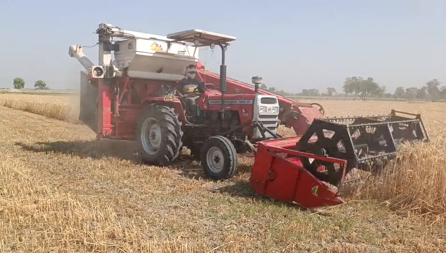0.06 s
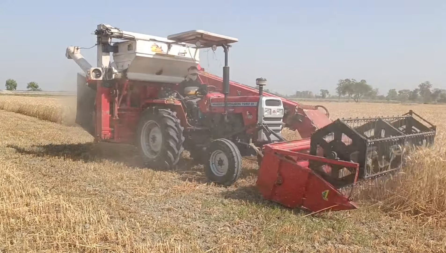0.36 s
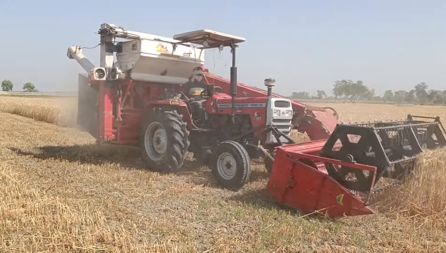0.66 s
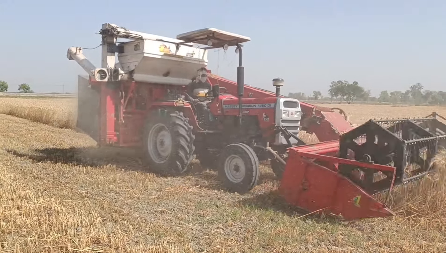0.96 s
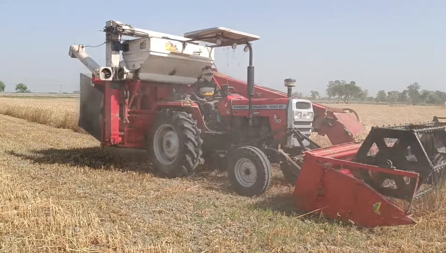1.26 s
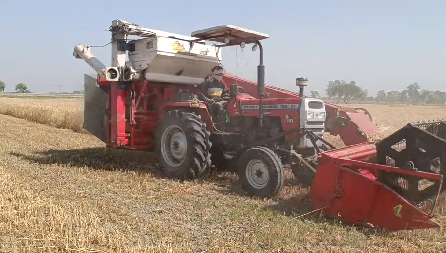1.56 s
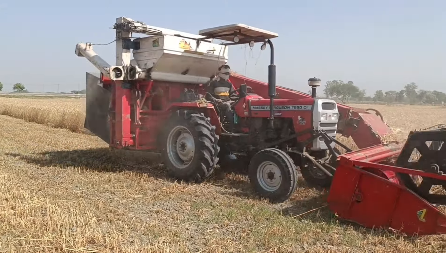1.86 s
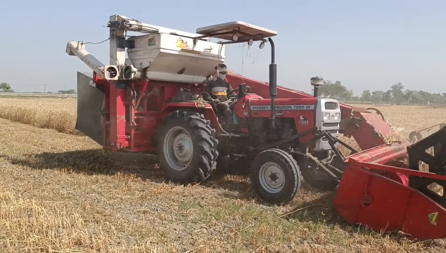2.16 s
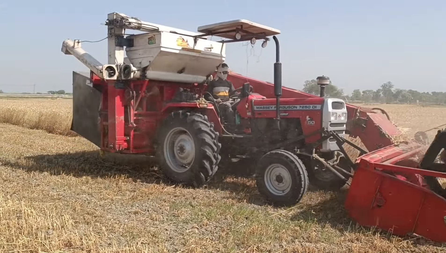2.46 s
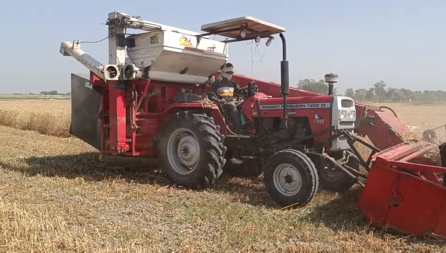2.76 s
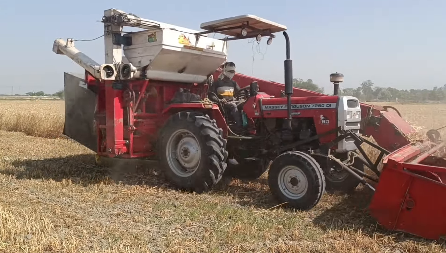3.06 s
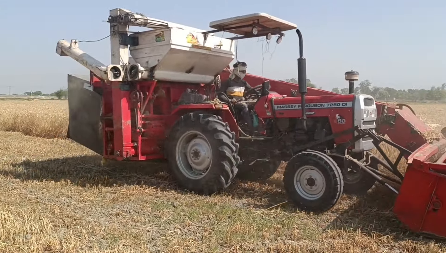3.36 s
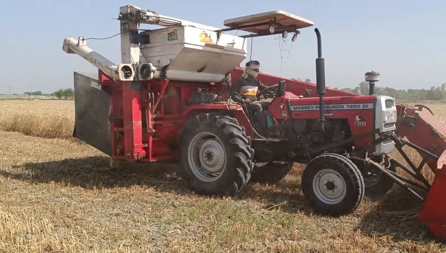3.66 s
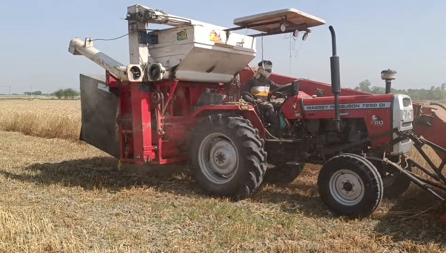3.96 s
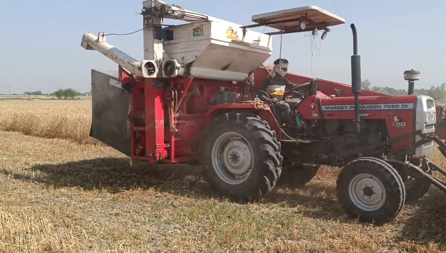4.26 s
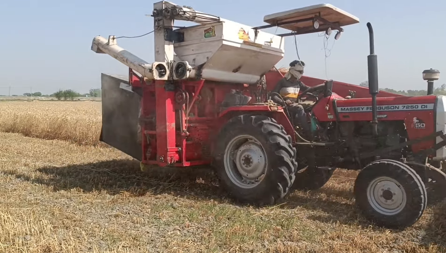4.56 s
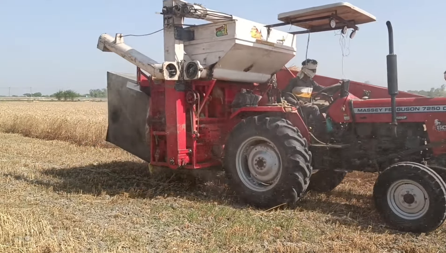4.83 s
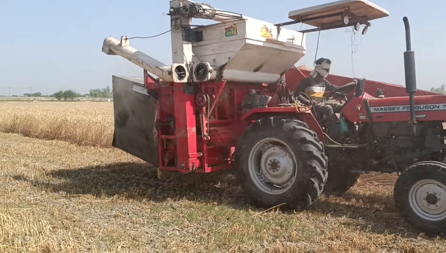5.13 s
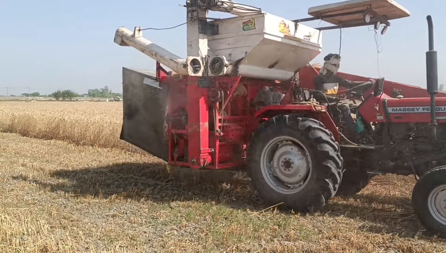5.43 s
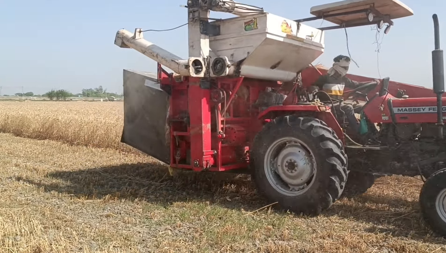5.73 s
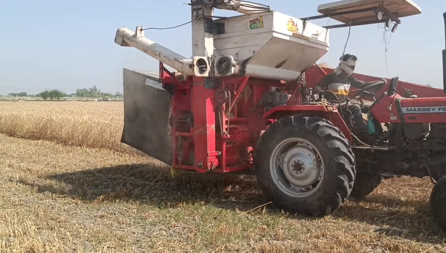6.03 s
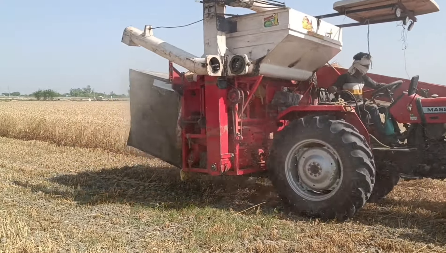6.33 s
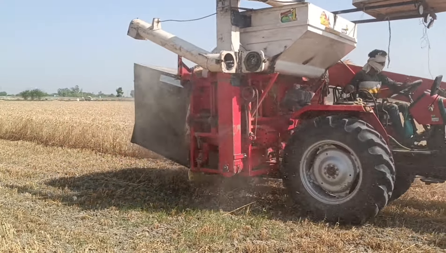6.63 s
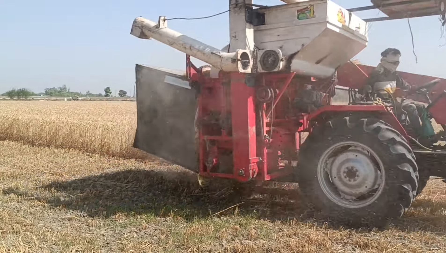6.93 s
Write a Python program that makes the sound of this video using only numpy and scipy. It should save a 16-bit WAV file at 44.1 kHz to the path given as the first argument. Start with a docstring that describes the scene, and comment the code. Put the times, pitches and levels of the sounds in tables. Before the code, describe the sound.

Stiff, gusty wind buffets the microphone in an open field while a combine harvester runs nearby without a break. Its diesel engine chugs under a swelling and sinking rush of straw, with rattling panels and clattering blades. Bright metal clinks cluster midway as the cutter passes, along with snapping stalks. Toward the end, clumps of crop scrape and knock against the machine's side.

```python
"""A combine harvester in the wind

A tractor-mounted combine crawls through wheat, a few metres from a phone in a stiff breeze.
Straw and grain rush through the thresher, the diesel knocks, stalks crack and loose steel clinks.
Wind buffets each microphone port (opening) on its own and lays a fluttering rumble over the machine."""
import sys
import numpy as np
from scipy import signal
from scipy.fft import rfft, irfft, next_fast_len
from scipy.io import wavfile
from scipy.ndimage import uniform_filter1d, map_coordinates

SR = 44100
rng = np.random.default_rng(int(sys.argv[2]) if len(sys.argv) > 2 else 0)


def master_out(mix):
    """Clip the mix to full scale and print it as 16-bit PCM to the path in sys.argv[1]."""
    frames = np.transpose(np.atleast_2d(mix))
    ceiling = np.clip(frames, -1, 1)
    pcm = np.round(ceiling * 32767).astype(np.int16)
    wavfile.write(sys.argv[1], SR, pcm)


N = 312669
TIME = np.arange(N) / SR
FIRING_HZ, CUTTER_HZ = 59.2, 14.7  # engine firings and knife strokes each second
PASSING_S, PASSING_HALF_S = 4.5, .97  # when the cutter bar is closest, and half how long it stays near


def undb(db):
    """Turn decibels into a gain to multiply by."""
    return 10 ** (np.asarray(db) / 20)


def unit(x):
    """Scale to an average strength (rms) of 1."""
    return x / np.sqrt(np.mean(x ** 2))


def curves(table):
    """Join each column's points with straight lines in time."""
    s, *columns = np.transpose(table)
    return [np.interp(TIME, s, c) for c in columns]


def bump(middle_s, half_s):
    """A smooth rise and fall, 1 at its top."""
    return np.exp(-((TIME - middle_s) / half_s) ** 2)


def swells(table):
    """Add up smooth rises and dips, in dB."""
    return sum(db * bump(s, half_s) for s, db, half_s in table)


def panned(pan_db):
    """Left and right gains of constant power; pan is the left level minus the right."""
    gains = undb(np.array([pan_db, -pan_db]) / 2).reshape(2, -1)
    return gains / np.sqrt(np.mean(gains ** 2, axis=0))


def shape(x, spectrum):
    """Turn each frequency up or down along one curve, or one for each side."""
    hz, *columns = np.transpose(spectrum)
    size = next_fast_len(N)
    log_hz = np.log(np.arange(size // 2 + 1) * SR / size + 1)
    gain = undb([np.interp(log_hz, np.log(hz), c) for c in columns])
    return irfft(rfft(x, size) * gain, size)[:, :N]


def colour(x, spectrum):
    """Shape the tone, then scale to strength 1."""
    return unit(shape(x, spectrum))


def ring(x, modes):
    """Make a sound ring at an object's own pitches, its modes."""
    return sum(undb(db) * signal.lfilter(*signal.iirpeak(hz, hz / width, fs=SR), x)
               for hz, width, db in modes)


def walk(rate):
    """Glide to a new random value `rate` times a second."""
    hold = int(SR / rate)
    steps = rng.standard_normal(1024)[np.arange(N) // hold % 1024]
    return unit(uniform_filter1d(uniform_filter1d(steps, hold), hold // 2))


def per_port(rate):
    """A separate, limited random walk for each port."""
    return unit(np.tanh(.6 * np.array([walk(rate), walk(rate)])))


def fade(hits, decay_s):
    """Let every hit jump up and die away."""
    return signal.lfilter([1], [1, -np.exp(-1 / (decay_s * SR))], hits)


def pelting(rate, spread_db):
    """Hits at random moments: many small, a few large."""
    when, size = rng.random((N, 2)).T
    return (when < rate / SR) * undb(spread_db * np.minimum(-np.log(1 - size), 4))


def shower(rate, spread_db, decay_s):
    """The flickering power of many small hits, 1 on average."""
    power = fade(pelting(rate, spread_db) ** 2, decay_s)
    return power / power.mean()


def strokes(hz, jitter, scatter_db):
    """One hit a cycle, each early or late and of its own size; the speed wanders."""
    timing, size, drift = rng.standard_normal((1024, 3)).T
    cycles = np.arange(1024) + jitter * timing + .022 * np.cumsum(drift)
    at = (cycles * SR / hz).astype(int)
    inside = (at >= 0) & (at < N)
    return np.bincount(at[inside], undb(scatter_db * np.tanh(size[inside] / 2) * 2), N)


def bursts(table, decay_s):
    """Left and right loudness of listed blows, each dying away."""
    hits = np.zeros((2, N))
    for s, db, pan_db in table:
        hits[:, int(s * SR)] = undb(db) * panned(pan_db)[:, 0]
    return fade(hits, decay_s)


# how much later sound reaches the left port as the machine moves right: (time [s], delay [ms])
LEFT_DELAY = [(0, .075), (2.75, .2), (7.09, .49)]
def airborne(direct):
    """Noise at both ports: a direct share, late on the left, and a scattered rest."""
    common = rng.standard_normal(N)
    delay = curves(LEFT_DELAY)[0] * SR / 1000
    late = map_coordinates(common, [np.arange(N) - delay], order=3)
    scattered = rng.standard_normal((2, N))
    return np.sqrt(direct) * np.array([late, common]) + np.sqrt(1 - direct) * scattered


# tone of rushing straw and grain: (frequency [Hz], left level [dB], right level [dB])
STRAW_TONE = [(1500, -44, -29), (2720, -6.5, -6.5), (3660, -10, 1), (4470, -16, -1.5), (4950, 1.5, -3),
              (5260, -11, -2), (6100, 0, -2), (6270, -2.5, 2), (7430, 7, 5), (7600, 1, 3.5),
              (8750, -3.5, -4), (10450, 2, 2.5), (15400, -11.5, -15)]
# tone of the thresher's metal body: (frequency [Hz], left level [dB], right level [dB])
BODY_TONE = [(398, -3, -29), (996, 8, 5), (1220, -9, -14), (1490, 4, -1), (1820, -1.5, -15),
             (2170, 2.5, -7.5), (2860, -7.5, -31), (4870, -35, -7.5)]
def thresher(firings):
    """Chaff hisses in fine showers, stalks thump the metal in coarser ones; both pulse with the engine."""
    knock = unit(fade(np.sqrt(firings), decay_s=.017))
    surge = undb(.8 * walk(rate=28))
    chaff = shower(rate=500, spread_db=3, decay_s=.003)
    stalks = shower(rate=220, spread_db=2.4, decay_s=.0045)
    straw = surge * np.sqrt(.35 + .65 * chaff + .3 * knock ** 2) * airborne(direct=.026)
    body = surge * np.sqrt(.073 + .41 * stalks + 1.7 * knock ** 2) * airborne(direct=.079)
    return colour(straw, STRAW_TONE), colour(body, BODY_TONE)


# strength of the sheet-metal rattle: (time [s], level [dB], pan before narrowing [dB])
RATTLE_LEVEL = [(0.0, -44, 5), (1.64, -30, -8), (1.74, -40.5, 3), (2.85, -42, 3), (3.21, -36.5, 11),
                (3.31, -40, -10), (3.93, -33, -7), (4.03, -31.5, 2), (4.71, -39.5, 15), (4.81, -35, 17),
                (4.99, -37, -2), (6.65, -34.5, 2), (6.82, -30, 3), (7.09, -30, -6)]
def rattle(body):
    """The thresher's sheet metal rattles louder and softer, swinging a little from side to side."""
    db, pan_db = curves(RATTLE_LEVEL)
    return undb(db + 4.5) * body * panned(.39 * pan_db - .5)


# ring of the steel parts: (pitch [Hz], width [Hz], level [dB])
STEEL_MODES = [(1900, 150, -8), (2100, 150, -9), (3230, 140, -9), (3620, 180, -4), (3850, 180, -6),
               (4035, 90, 0), (5000, 300, -11), (7360, 170, 2), (7750, 300, -4), (8200, 300, -7)]
def cutter():
    """The knife bar slaps its guides, louder as it passes; each blow favours other modes of the steel."""
    slaps = strokes(CUTTER_HZ, jitter=.1, scatter_db=3) + .45 * pelting(rate=90, spread_db=2.4)
    scrape = fade(slaps, decay_s=.002) * airborne(direct=.4)
    steel = sum(ring(scrape * undb(1.6 * walk(rate=190)), [mode]) for mode in STEEL_MODES)
    return undb(-13.5 + 2 * bump(PASSING_S, PASSING_HALF_S)) * unit(steel)


# ring of a snapping stalk: (pitch [Hz], width [Hz], level [dB])
SNAP_MODES = [(3700, 260, -16), (4030, 180, -7), (7800, 350, 7), (7830, 440, 8), (5500, 4000, -6)]
def snaps():
    """Single dry stalks snap against the steel, mostly on the right."""
    hits = fade(pelting(rate=45, spread_db=2.2), decay_s=.0011)
    return undb(-13.5) * panned(-4) * unit(ring(hits * airborne(direct=.11), SNAP_MODES))


def pings():
    """Kernels and stubs hit the panels at random; each spot rings briefly at its own pitch."""
    per_s, ring_s, spread_db = 420, .003, 2
    low_hz, high_hz = 1400, 4400
    out, t = np.zeros((2, N + 1024)), np.arange(1024) / SR
    for when, pitch, size, side, *phases in rng.random((int(per_s * N / SR), 6)):
        hz = low_hz + (high_hz - low_hz) * pitch
        tone = np.sin(2 * np.pi * (hz * t + np.array(phases)[:, None])) * np.exp(-t / ring_s)
        db = spread_db * min(-np.log(1 - size), 3)
        start = int(when * N)
        out[:, start:start + len(t)] += undb(db) * panned(20 * (side - .5)) * tone
    return undb(-13) * unit(out[:, :N])


# strength of the rush, which swells and sinks: (time [s], level [dB], pan before a shift left [dB])
RUSH_LEVEL = [(0.0, -28, -5.5), (1.05, -26.5, -5), (1.15, -26, -9), (1.53, -26, -3), (1.8, -26, -12.5),
              (2.3, -28, -8), (2.41, -33, -2), (2.55, -32.5, -6), (2.85, -32, -9.5), (3.16, -24.5, -3),
              (3.67, -29.5, -13), (4.06, -23.5, -1.5), (4.4, -28, -4.5), (5.22, -31, -2.5), (5.32, -33, 2),
              (5.54, -27, -3.5), (6.05, -31, 1), (6.85, -25, -3), (7.09, -22.5, -4)]
# wads of straw in the drum, and gaps between them: (middle [s], change [dB], half length [s])
STRAW_WADS = [(.23, -5, 0.15), (.33, 7, 0.028), (.47, 1.5, 0.03), (.83, 3.5, .025), (1.0, 5.5, .025),
              (1.13, 2, 0.033), (1.49, 5.5, 0.042), (1.86, -3.5, 0.049), (2.31, 5, 0.017),
              (2.58, 7.5, 0.028), (2.725, 6, 0.021), (2.96, 6, 0.037), (4.39, 0, 0.032), (4.6, 4.5, 0.038),
              (4.72, -8, 0.021), (4.79, 3.5, 0.16), (4.992, -2, .016), (5.08, -3, .015), (5.2, 8.5, 0.017),
              (5.67, 2.5, 0.014), (5.745, -1, 0.022), (5.92, 3, 0.032), (6.16, 2, 0.018), (6.26, 5, 0.033),
              (6.36, -3, 0.02), (6.42, 2, 0.02), (6.87, 2, 0.055)]
def rush(straw):
    """Straw, cutter, snaps and pings grow louder and softer together."""
    db, pan_db = curves(RUSH_LEVEL)
    level = undb(db + swells(STRAW_WADS) - .12)
    return level * (straw + cutter() + snaps() + pings()) * panned(pan_db + 5)


# ring of the exhaust pipe: (pitch [Hz], width [Hz], level [dB])
PIPE_MODES = [(121, 78, 6.5), (220, 90, 4), (340, 254, 5)]
def exhaust(firings):
    """Each firing of the diesel sets the pipe booming."""
    return undb(-28.5) * unit(ring(ring(firings, PIPE_MODES), PIPE_MODES))


# tone of large swirls of air: (frequency [Hz], left level [dB], right level [dB])
RUMBLE_TONE = [(20, -31, -20), (42, -54, -23), (72, -9, -8.5), (102.6, -2.5, -2), (163, -1, 1.5),
               (227, 2.5, 0), (358, -4.5, -2), (456, -14, -9), (663, -25, -16.5), (1390, -38, -33.5)]
# strength of their rumble: (time [s], level [dB])
RUMBLE_LEVEL = [(0, -15), (.8, -14.5), (1.15, -15), (2.1, -14), (3.0, -16.5), (3.8, -14), (4.1, -17.5),
                (4.35, -12), (4.55, -15.5), (5.3, -16.5), (6.5, -15), (7.09, -15.5)]
# tone of small swirls: (frequency [Hz], level [dB])
FLUTTER_TONE = [(100, -50), (250, 0.5), (400, 6.5), (520, 0.5), (750, -3), (1000, -11.5), (1400, -16),
                (2500, -31.5), (6000, -74)]
# strength of their flutter: (time [s], level [dB], pan [dB])
FLUTTER_LEVEL = [(0, -22, 4.5), (1.5, -23, 5.5), (2.0, -23.5, 1.5), (2.65, -23, 5.5), (2.78, -20.5, 2),
                 (3.2, -24, -1), (3.45, -20, 3), (4.15, -30.5, 10), (4.46, -24, 3), (5.2, -23.5, 3.5),
                 (5.85, -22.5, -4.5), (7.09, -25.5, 1)]
# brief drops in the wind: (middle [s], change [dB], half length [s])
WIND_LULLS = [(.03, -1.5, 0.014), (.083, -6, 0.014), (.185, -3, 0.021), (.28, -10.5, 0.024),
              (1.78, -3, 0.039), (1.95, -3, 0.027), (2.185, -5, 0.009), (2.415, -12, 0.012),
              (2.48, -3, 0.0087), (2.55, -5.5, 0.03), (2.66, -3.5, 0.03), (2.9, -3, 0.049),
              (3.13, -2, 0.022), (3.685, -6, 0.011), (3.95, -3.5, 0.015), (4.228, -2, 0.014),
              (4.755, -20, 0.0049), (4.9, -9, 0.0055), (5.34, -2.5, 0.024), (5.62, -5, 0.016),
              (6.355, -9, 0.011), (6.84, -3, 0.04)]
def wind():
    """Air swirls at each port: large swirls rumble, small ones come in ragged puffs; gusts lift both."""
    longest_puff_s = .09
    gusts = per_port(rate=27)
    swirl = np.array([walk(rate=90), walk(rate=90)])
    slow_swirl = uniform_filter1d(swirl, int(longest_puff_s * SR))
    puffs = np.tanh(.8 * unit(swirl - slow_swirl))
    large = airborne(direct=.21) * undb(2.4 * puffs + .5 * gusts)  # the largest span both ports
    small = rng.standard_normal((2, N)) * undb(6.8 * puffs + 1.5 * gusts)
    rumble = undb(curves(RUMBLE_LEVEL)[0] - 1.57) * colour(large, RUMBLE_TONE)
    db, pan_db = curves(FLUTTER_LEVEL)
    flutter = undb(db + 1.5) * panned(pan_db) * colour(small, FLUTTER_TONE)
    return undb(swells(WIND_LULLS)) * (rumble + flutter)


# sharp blows of wind: (middle [s], peak level [dB], pan [dB], rise and fall [s])
WIND_BUFFETS = [(.052, -19, 14, .01), (.135, -18, 12, 0.012), (.157, -25, 4, 0.0038),
                (0.217, -18, 4, 0.0051), (.308, -21.5, -6, 0.0048), (.352, -16, 6, 0.011),
                (.46, -15.5, 22, 0.024), (.518, -19, 3, .007), (1.848, -26, 12, 0.0038),
                (2.209, -18, -7, 0.0035), (2.379, -13, -5, 0.0051), (2.442, -14, 14, 0.011),
                (2.505, -12.5, 20, 0.009), (2.612, -10.5, -2, 0.0049), (2.752, -13.5, 1, 0.017),
                (2.785, -22, -8, 0.015), (2.825, -15.5, 5, 0.0096), (3.0, -17, -4, 0.065),
                (3.38, -21, -5, 0.022), (3.465, -18, 3, 0.018), (3.621, -13, 14, 0.003),
                (3.892, -15, 2, 0.021), (4.19, -12.5, -6, 0.0055), (4.355, -18, 2, 0.013),
                (4.387, -15, 1, .006), (4.424, -15.5, 2, .0035), (4.495, -16.5, -12, 0.011),
                (4.699, -15.5, 11, 0.013), (4.785, -18, 5, 0.0054), (4.876, -13.5, -7, 0.0061),
                (5.279, -26, -2, 0.0035), (5.41, -12, -11, 0.0056), (5.505, -18.5, 2, 0.027),
                (5.73, -16, -12, 0.011), (5.801, -20.5, -14, .012), (5.836, -16.5, -1, 0.0095),
                (6.411, -18, 24, 0.0075)]
# tone of one blow: (frequency [Hz], level [dB])
BUFFET_TONE = [(90, -20), (220, 1), (400, 5), (600, 0), (1000, -8), (1400, -14), (2500, -26.5), (6000, -62)]
def buffets():
    """Wind hits the ports in sudden low thumps."""
    blows = sum(undb(db) * panned(pan_db) * np.exp(-np.abs(TIME - s) / length_s)
                for s, db, pan_db, length_s in WIND_BUFFETS)
    return blows * colour(rng.standard_normal((2, N)), BUFFET_TONE)


# blows on loose steel: (time [s], level [dB], pan [dB], low pitch [Hz], low minus high mode [dB])
STEEL_CLINKS = [(.311, -18, -16, 3530, -4), (.503, -20, -9, 3560, 3), (.671, -19, -9, 3640, 2),
                (0.806, -16, -8, 3570, -16), (1.207, -21, -8, 3640, -6), (1.309, -20, -6, 4040, -4),
                (1.481, -13, -11, 4000, -19), (1.61, -15, -1, 4250, -11), (1.734, -20, -2, 3930, -1),
                (2.16, -17, -15, 4000, 0), (2.178, -20, -12, 4050, -12), (2.79, -21, -3, 4000, -8),
                (2.805, -19, 0, 4050, -4), (2.83, -25, -1, 4080, -7), (2.953, -18.5, -10, 4050, 2),
                (2.992, -25, 3, 4000, -3), (3.116, -11, -9, 3820, -7), (3.186, -11.5, 0, 3980, -1),
                (3.203, -15, -3, 4050, -8), (3.257, -11.5, -10, 4100, 9), (3.266, -19, -8, 4000, -14),
                (3.308, -27, -8, 4000, 3), (3.324, -13, -17, 4200, -15), (3.338, -17.5, -14, 4000, -1),
                (3.427, -15, -12, 3950, -2), (3.51, -17, -9, 3810, -6), (3.461, -16.5, -12, 4000, -8),
                (3.525, -17, -11, 4140, 2), (3.545, -11.5, -9, 3710, 1), (3.593, -15.5, -18, 3830, -5),
                (3.609, -19, -10, 4060, 2), (3.645, -18, -14, 3810, 0), (3.748, -18, -8, 4060, -2),
                (3.854, -16, -10, 4020, -7), (3.914, -20, -17, 3980, 0), (4.186, -18, -6, 4080, 4),
                (4.253, -16, -1, 4060, 10), (4.438, -18, -5, 4000, -21), (4.473, -21, -2, 4060, -4),
                (4.49, -14.5, 2, 3660, -22), (4.589, -13.5, -15, 3700, -5), (4.668, -15, -4, 3680, -24),
                (4.961, -10.5, -15, 4050, -7), (6.516, -21, 2, 3900, -17), (6.58, -15, 8, 3680, -24),
                (6.836, -12, 1, 3940, -9), (6.853, -16.5, -4, 3950, -2), (6.891, -18, -2, 4000, 4),
                (7.026, -19.5, 0, 4100, -3)]
def clinks():
    """Loose steel chatters and rings in two modes; where it is struck sets their pitch and balance."""
    ring_s, strike_s, chatter_width_hz = .0037, .0015, 480
    out, t = np.zeros((2, N)), np.arange(2048) / SR

    def mode(hz, scrape):
        """A clean tone roughened by chatter."""
        clean = np.sin(2 * np.pi * (hz * t + rng.random((2, 1))))
        return clean + .7 * unit(ring(scrape, [(hz, chatter_width_hz, 0)]))

    for s, db, pan_db, low_hz, low_db in STEEL_CLINKS:
        high_hz = 7560 * (1 + .033 * np.tanh(rng.standard_normal()))
        scrape = rng.standard_normal((2, len(t)))
        low, high = mode(low_hz, scrape), mode(high_hz, scrape)
        tone = (undb(low_db) * low + high) / np.hypot(undb(low_db), 1)
        ringing = undb(-2) * tone * np.exp(-t / ring_s)
        strike = undb(-3.5) * scrape * np.exp(-t / strike_s)
        start = int(s * SR)
        out[:, start:start + len(t)] += undb(db) * panned(pan_db) * (ringing + strike)
    return out


# stalks breaking: (time [s], peak level [dB], pan [dB])
STALK_CRACKS = [(1.006, -18, 4), (1.503, -20, 1), (2.712, -19, -9), (2.889, -19.5, -9), (2.953, -25, -12),
                (3.062, -19.5, -1), (3.185, -26, 5), (4.019, -18, 3), (4.055, -16, 7), (4.254, -19, -2),
                (4.276, -17, 15), (4.297, -16, 1), (4.772, -17, -7), (4.808, -19, 0), (4.962, -31, -9),
                (5.027, -17.5, -13), (5.101, -26, -1), (5.197, -22, 2), (5.812, -20, -11), (6.155, -19, 6),
                (6.389, -22, -2), (6.409, -21, -10), (6.691, -21, 9), (6.705, -18, 0), (6.822, -15, 2),
                (6.834, -17, 5), (6.853, -19, 2), (6.903, -15, -3), (6.922, -16, -3), (7.006, -29, 0)]
# tone of a crack: (frequency [Hz], level [dB])
CRACK_TONE = [(500, -6), (1000, 6), (1900, -2), (2800, -6), (4000, 3.5), (5500, -3.5), (7500, 5.5),
              (10000, 0.5), (15000, -17)]
def cracks():
    """Bunches of stalks break in short, dry bursts of noise."""
    return bursts(STALK_CRACKS, decay_s=.005) * colour(airborne(direct=.15), CRACK_TONE)


# blows on the thresher's side: (time [s], peak level [dB], pan [dB])
SIDE_KNOCKS = [(3.188, -23, 15), (4.277, -23, 10), (6.155, -25, 10), (6.169, -27, 10), (6.327, -30, 0),
               (6.389, -30, 5), (6.412, -29, 4), (6.515, -32, 8), (6.54, -23, 8), (6.579, -25, 13),
               (6.691, -20, 11), (6.706, -22, 11), (6.761, -23, 10), (6.777, -22, 16), (6.836, -21, 9),
               (6.855, -24, 8), (6.901, -31, 10), (6.922, -27, 8), (7.007, -23, 8)]
# ring of that side, struck or scraped: (pitch [Hz], width [Hz], level [dB])
SIDE_MODES = [(1850, 270, 4), (2300, 220, -6), (3680, 1500, -9)]
def knocks():
    """Clumps of crop strike the thresher's side and make it ring."""
    return bursts(SIDE_KNOCKS, decay_s=.007) * unit(ring(airborne(direct=.27), SIDE_MODES))


# ring of the reel's steel prongs: (pitch [Hz], width [Hz], level [dB])
TINE_MODES = [(3280, 160, -6), (3600, 48, 0), (3960, 36, 3)]
def tines():
    """The reel's prongs tick against the crop, heard only while the cutter bar is near."""
    ticks = fade(pelting(rate=46, spread_db=8), decay_s=.0044) * airborne(direct=.66)
    near = bump(PASSING_S, PASSING_HALF_S)
    return undb(-38.5) * near * panned(-4) * unit(ring(ticks, TINE_MODES))


# crop scraping the thresher's side, longest as it passes: (middle [s], level [dB], half length [s])
SIDE_RASPS = [(4.04, -31, 0.045), (4.284, -30, 0.045), (6.27, -37.5, 0.66), (6.782, -30, 0.024),
              (6.877, -34, 0.07)]
def rasps():
    """Coarse showers of stalks scrape the sheet metal, mostly on the left."""
    grains = shower(rate=250, spread_db=2, decay_s=.004)
    scrape = np.sqrt(.32 + grains) * airborne(direct=.99)
    level = sum(undb(db) * bump(s, half_s) for s, db, half_s in SIDE_RASPS)
    return level * panned(12) * unit(ring(scrape, SIDE_MODES))


def scene():
    """The machine behind the wind."""
    firings = strokes(FIRING_HZ, jitter=.06, scatter_db=4.5)
    straw, body = thresher(firings)
    threshing = rush(straw) + rattle(body)
    sway = undb(np.array([[1.1], [1.4]]) * per_port(rate=22))  # the level wavers at each port
    machine = sway * (threshing + rasps()) + exhaust(firings) + tines()
    return machine + clinks() + cracks() + knocks() + wind() + buffets()


# the treble drops in a step above 8.5 kHz and lifts a little at the top: (frequency [Hz], level [dB])
TREBLE_TONE = [(8200, 0), (8300, 1.5), (8490, 1), (8600, -12), (13900, -12), (15300, -8)]
def record(dry):
    """The level flutters, the phone rounds the strongest buffets; the treble is dull, its top cut off."""
    tremor_hz, tremor_db, top_hz = 46.875, 1.1, 15760
    tremor = undb(-tremor_db * np.cos(2 * np.pi * tremor_hz * TIME))
    rounded = np.tanh(1.146 * tremor * dry) / 1.157
    dulled = shape(rounded, TREBLE_TONE) * undb(1)
    return signal.sosfilt(signal.ellip(14, .2, 90, top_hz, fs=SR, output="sos"), dulled)


dry = scene()
out = record(dry)
master_out(out)
```